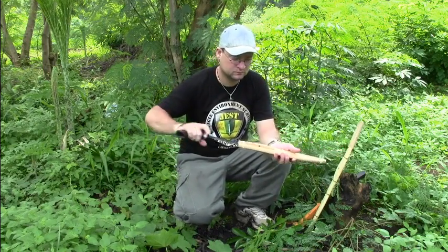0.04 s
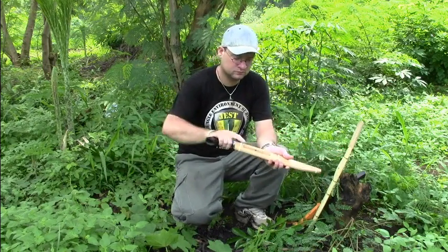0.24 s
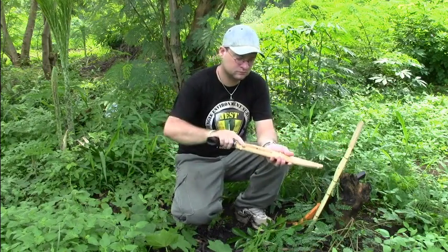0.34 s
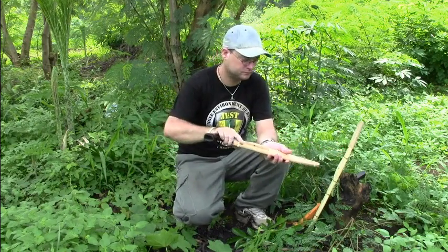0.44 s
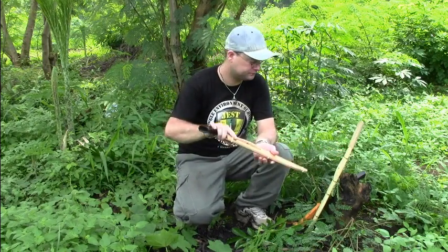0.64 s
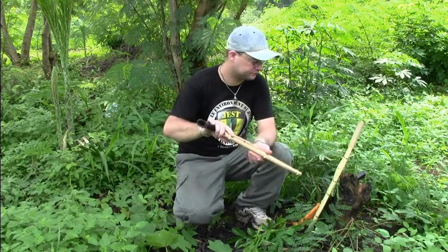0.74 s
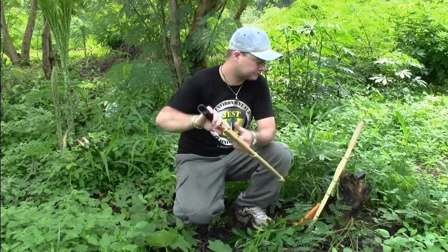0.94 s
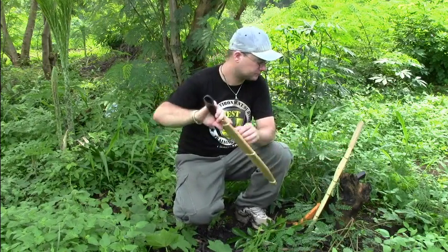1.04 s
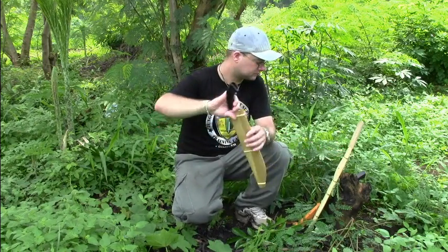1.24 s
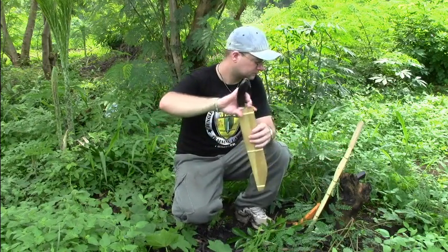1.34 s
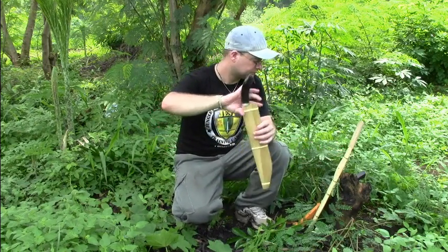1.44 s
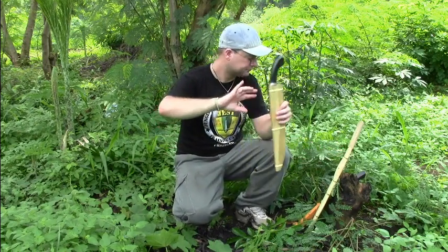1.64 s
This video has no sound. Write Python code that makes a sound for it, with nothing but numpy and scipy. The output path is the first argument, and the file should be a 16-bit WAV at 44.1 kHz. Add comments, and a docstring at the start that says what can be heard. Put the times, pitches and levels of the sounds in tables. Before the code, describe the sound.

A steel blade scrapes briefly into a wooden sheath, knocks against its walls and seats with a sharp clack close ahead. Trees give a short echo, leaving faint airy hiss, low rumble, insects and distant birds.

```python
"""A steel blade scrapes into a wooden sheath, bumps its walls twice and seats with a sharp double clack.
The scrape is dense friction slips coloured by the hollow sheath; the clack is the hilt striking and
rebounding, each contact a crack plus damped wood modes. The surrounding trees throw the sound back.
Behind it: airy hiss, a low outdoor rumble, a high insect buzz, distant birds, one handling tick."""
import sys
import numpy as np
from scipy import signal
from scipy.fft import rfft, irfft, next_fast_len
from scipy.io import wavfile
from scipy.ndimage import map_coordinates

SR = 44100
rng = np.random.default_rng(int(sys.argv[2]) if len(sys.argv) > 2 else 0)


def bounce(signal):
    """Save signal as a 16-bit WAV file at the path given by the first command-line argument."""
    frames = np.transpose(np.atleast_2d(signal))
    limited = np.clip(frames, -1, 1)
    pcm = np.round(limited * 32767).astype(np.int16)
    wavfile.write(sys.argv[1], SR, pcm)


N = 74970

# Hilt contacts. Each entry: start in seconds.
CONTACT_S = [.2100, .2199, .2257, .2305]


def amp(db):
    return 10 ** (np.asarray(db) / 20)


def unit(x):
    return x / np.sqrt(np.mean(x ** 2) + 1e-20)


def along(points, hz):
    """Interpolate (Hz, value) points on a log axis."""
    f, v = np.transpose(points)
    return np.interp(np.log(hz + 1), np.log(f + 1), v)


def clock():
    return np.arange(N) / SR


def curve(rows):
    """Interpolate (seconds, value) points."""
    return np.interp(clock(), *np.transpose(rows))


def wobble(knots_per_s):
    """Smooth random curve."""
    return map_coordinates(rng.standard_normal(4096), [clock() * knots_per_s], mode="wrap")


def fade(t60_s):
    return np.exp(-np.log(1000) * clock() / t60_s)


def filtered(x, response):
    size = next_fast_len(N + SR // 2)
    return irfft(rfft(x, size) * response(np.fft.rfftfreq(size, 1 / SR)), size)[..., :N]


def delayed(x, delay_s):
    return filtered(x, lambda hz: np.exp(-2j * np.pi * hz * delay_s))


def noise(colour):
    """Noise shaped by (Hz, dB) points, rms 1."""
    return unit(filtered(rng.standard_normal(N), lambda hz: amp(along(colour, hz))))


def diffuse(response):
    """Stereo noise from all around, rms 1."""
    # Each row: frequency in Hz, left-right correlation.
    correlation = [(40, 0.75), (120, 0.86), (280, 0.12), (700, 0.51), (2000, 0.86), (8000, 0.77)]

    def mid_side_gains(hz):
        angle = np.arccos(np.clip(along(correlation, hz), -1, 1)) / 2
        return response(hz) * np.array([np.cos(angle), np.sin(angle)])

    mid, side = filtered(rng.standard_normal((2, N)), mid_side_gains)
    return unit(np.array([mid + side, mid - side]))


def slips(rate_per_s=9000, spread_db=2):
    """Tiny uneven slips of steel on wood."""
    slipping = rng.random(N) < rate_per_s / SR
    return slipping * rng.standard_normal(N) * amp(spread_db * rng.standard_normal(N))


def scrape(rasp_db=1.5, hollow_db=-5.5):
    """Broad friction rasp; sheath resonances take turns as the blade goes deeper."""
    # Each row: time in seconds, friction level in dB.
    stroke = [(0, -42.5), (.03, -41.5), (.075, -40.5), (.11, -41.5), (.125, -38.5), (.17, -38.5),
              (.198, -38), (.204, -47), (.209, -21.5), (.216, -70)]
    # Each row: frequency in Hz, gain in dB.
    rasp_colour = [(200, -35), (450, -32), (650, 1), (1100, -2.5), (1700, -1), (2300, -2), (3900, -2),
                   (5000, -13), (6500, -4), (8000, -6), (11000, -9), (12000, -17), (15500, -24)]
    # Each row: centre in Hz, width in Hz, gain in dB, peak time in seconds, span in seconds.
    cavity_modes = [(740, 120, 0.5, 0.042, 0.045), (666, 210, -1.5, .15, 0.064), (942, 97, 8.5, 0.1, 0.025),
                    (1414, 230, 5, 0.21, 0.17), (4000, 430, 1.5, 0.13, 0.027)]
    t = clock()
    rasp = unit(filtered(slips(), lambda hz: amp(along(rasp_colour, hz))))
    hollow = np.zeros(N)
    for centre_hz, width_hz, db, peak_s, span_s in cavity_modes:
        band = filtered(slips(), lambda f: 1j * f * width_hz / (centre_hz**2 - f*f + 1j * f * width_hz))
        hollow += amp(db) * unit(band) * np.exp(-((t - peak_s) / span_s) ** 2)
    friction = amp(curve(stroke)) * (t < stroke[-1][0])
    return friction * (amp(rasp_db) * rasp + amp(hollow_db) * hollow)


def outdoors(air_db=-50, rumble_db=-45, swing_db=0.5, pan_db=1.54):
    """Hiss of air and leaves over an uneven low rumble."""
    # Both spectra, each row: frequency in Hz, gain in dB.
    air_colour = [(110, -36), (180, -5), (372, -5.5), (628, -7), (1990, -17.5), (3490, -19), (6100, -26.5),
                  (7920, -26.5), (9030, -29), (14100, -33.5), (15500, -37)]
    rumble_colour = [(12, -43), (20, -10), (43, -7), (59, 0.5), (87, -6), (124, 0), (150, -4.5),
                     (173, -11.5), (221, -21), (260, -14.5), (340, -26.5), (570, -120)]
    air = amp(air_db) * diffuse(lambda hz: amp(along(air_colour, hz)))
    rumble_gain = amp(rumble_db - swing_db * wobble(11))
    rumble = rumble_gain * diffuse(lambda hz: amp(along(rumble_colour, hz)))
    return air + rumble * amp([[-pan_db], [pan_db]])


def insects(centre_hz=7910, half_width_hz=290, flutter_db=1.5, gain_db=2.5):
    """Narrow, fluttering band of stridulation."""
    # Each row: time in seconds, level in dB before gain.
    levels = [(0.36, -65.5), (0.448, -68), (0.464, -64.5), (1.39, -67.5), (1.7, -62)]
    band = diffuse(lambda hz: 1 / (1 + ((hz - centre_hz) / half_width_hz) ** 2))
    buzz = unit(band * amp(flutter_db * wobble(170)))
    return amp(gain_db + curve(levels)) * buzz


def bumps(t60_s=0.039):
    """Dull knocks of the blade on the sheath walls."""
    # Each row: start in seconds, level in dB.
    hits = [(.0155, -32), (.0875, -24), (.0935, -31.5)]
    # Each row: frequency in Hz, gain in dB.
    colour = [(60, -57), (300, -27), (550, -4), (900, -4), (1600, -6.5), (2200, -11), (3200, -15),
              (5000, -37), (8000, -23), (15000, -56)]
    return sum(delayed(amp(db) * noise(colour) * fade(t60_s), start_s) for start_s, db in hits)


def tree_echo(x, envelope):
    """Scatter off trunks and leaves: convolution with a stereo noise tail."""
    # Each row: frequency in Hz, gain in dB.
    colour = [(200, -43), (800, 8), (1500, 2.5), (3000, 6), (5000, -1), (8000, -6.5), (15000, -21)]
    tail = diffuse(lambda hz: amp(along(colour, hz))) * envelope
    tail /= np.sqrt(np.sum(tail ** 2) / 2)
    return signal.fftconvolve(x[None], tail, axes=1)[:, :N]


def contact(crack_db=-11, crack_t60_s=.018, hold_s=.0016, attack_s=.00015, max_t60_s=.042):
    """One hilt blow: a crack plus short, damped wood modes."""
    # Sheath with blade seated. Each row: frequency in Hz, level in dB, T60 in seconds, before the cap.
    modes = [(661, -20, 0.039), (816, -26, .06), (936, -28, 0.049), (1317, -16, 0.02), (1482, -17, 0.046),
             (1630, -16.5, 0.031), (2000, -13.5, 0.03), (2175, -11.5, 0.017), (2620, -20.5, 0.062),
             (2763, -26, 0.049), (3120, -20.5, 0.027), (3325, -14.5, 0.023), (3830, -34, 0.0091),
             (4368, -14.5, 0.029), (4790, -14.5, 0.0153)]
    # Each row: frequency in Hz, gain in dB.
    crack_colour = [(200, -51), (500, -19), (1000, -27), (1600, -1.5), (2500, 1.5), (4600, -0.5),
                    (5400, -11), (6600, 0.5), (7200, -3), (8500, 2.5), (9100, -3.5), (11300, -5),
                    (15000, -21.5)]
    t = clock()
    ring = np.zeros(N)
    for k, (hz, db, t60_s) in enumerate(modes):
        ring += (-1) ** k * amp(db) * fade(min(t60_s, max_t60_s)) * np.sin(2 * np.pi * hz * t)
    crack_decay = np.exp(-np.log(1000) * np.maximum(t - hold_s, 0) / crack_t60_s)
    crack = amp(crack_db) * noise(crack_colour) * crack_decay
    return (ring + crack) * (1 - np.exp(-t / attack_s))


def clack(steel_hz=4380, steel_db=-34.5, steel_t60_s=0.23):
    """Hilt hits the sheath mouth and rebounds, softer and duller each time; the steel rings faintly."""
    # One row per contact: gain in dB, bass edge in Hz, treble edge in Hz.
    blows = [(3, 700, 26000), (-1.5, 710, 5300), (-3.5, 850, 1800), (-10, 160, 770)]
    steel = amp(steel_db) * fade(steel_t60_s) * np.sin(2 * np.pi * steel_hz * clock())
    out = delayed(steel, CONTACT_S[0])
    for start_s, (db, low_hz, high_hz) in zip(CONTACT_S, blows):
        blow = filtered(contact(), lambda hz: 1j * hz / (low_hz + 1j * hz) / (1 + 1j * hz / high_hz))
        out += amp(db) * delayed(blow, start_s)
    return out


def spill(gain_db=-5.5, t60_s=0.085):
    """Broad burst the clack throws sideways into the trees."""
    # Each row: frequency in Hz, gain in dB.
    colour = [(300, -14), (800, -8), (1400, -6.5), (2100, -0.5), (3200, -2), (4400, 1), (5500, -3),
              (8000, -0.5), (15000, -6.5)]
    return delayed(amp(gain_db) * noise(colour) * fade(t60_s), CONTACT_S[0])


def birds(waver=.018, waver_per_s=500, echo_db=-3, echo_t60_s=.55):
    """Distant whistled glides, smeared by the trees."""
    # Each row: start in seconds, length in seconds, start pitch in Hz, end pitch in Hz, level in dB.
    notes = [(.37, .06, 3330, 3420, -57), (.522, .035, 3250, 2900, -54), (.675, .025, 4500, 4430, -61),
             (.70, .035, 2220, 2400, -55), (.75, .07, 2330, 2360, -61), (.98, .035, 4000, 4500, -62),
             (1.015, .085, 3380, 3900, -55), (1.07, .04, 3830, 3790, -56), (1.09, .06, 3520, 3560, -59),
             (1.21, .06, 3800, 3400, -59), (1.27, .05, 3550, 3950, -58), (1.29, .08, 3400, 3480, -61),
             (1.445, .06, 3300, 3390, -55), (1.50, .04, 3550, 3500, -62), (1.58, .025, 4550, 4450, -63)]
    song = np.zeros(N)
    for start_s, length_s, start_hz, end_hz, db in notes:
        progress = np.clip((clock() - start_s) / length_s, 0, 1)
        glide_hz = start_hz + (end_hz - start_hz) * progress
        pitch_hz = glide_hz * (1 + waver * wobble(waver_per_s))
        song += amp(db) * np.sin(np.pi * progress) * np.sin(2 * np.pi * np.cumsum(pitch_hz) / SR)
    return song + amp(echo_db) * tree_echo(song, fade(echo_t60_s))


def tick(start_s=1.111, level_db=-51.5, t60_s=.035):
    """Light tick as the sheath turns in the hand."""
    # Each row: frequency in Hz, gain in dB.
    colour = [(1000, -16), (5000, -13), (9000, -4), (15000, -12)]
    return delayed(amp(level_db) * noise(colour) * fade(t60_s), start_s)


def scene(pan_db=.2, echo_db=-21.5):
    """Sheath ahead, trees all around."""
    # Tree echo envelope. Each row: delay in seconds, relative level in dB.
    echo_shape = [(0, -8), (.015, 3), (.045, -11), (.07, -2.5), (.085, -4), (.12, -13.5), (.17, -19),
                  (.3, -30), (.5, -77)]
    handling = scrape() + bumps() + tick()
    direct = (handling + clack()) * amp([[-pan_db], [pan_db]])
    echo = amp(echo_db) * tree_echo(handling + spill(), amp(curve(echo_shape)))
    return direct + echo + birds() + insects() + outdoors()


def record(dry, ceiling=.9, cutoff_hz=15400):
    """Soft clip, then steep low-pass."""
    rounded = dry / (1 + np.abs(dry / ceiling) ** 6) ** (1 / 6)
    return filtered(rounded, lambda hz: 1 / (1 + (hz / cutoff_hz) ** 80))


dry = scene()
out = record(dry)
bounce(out)
```